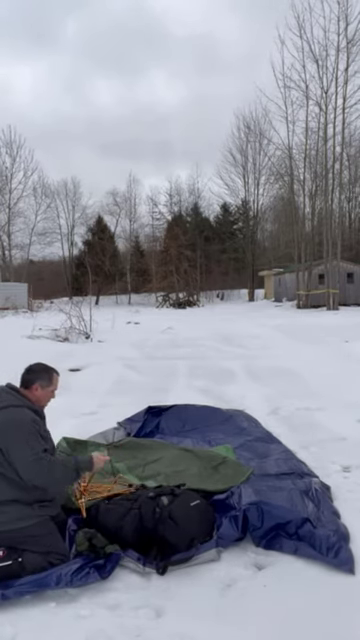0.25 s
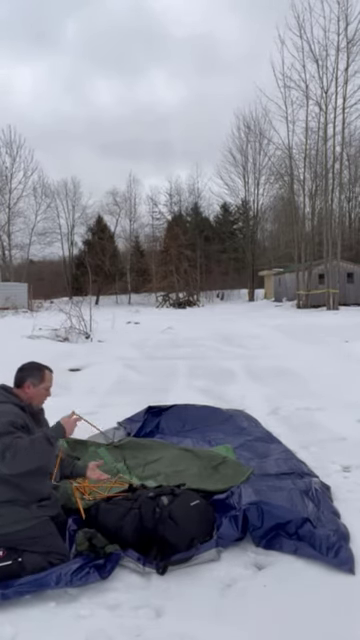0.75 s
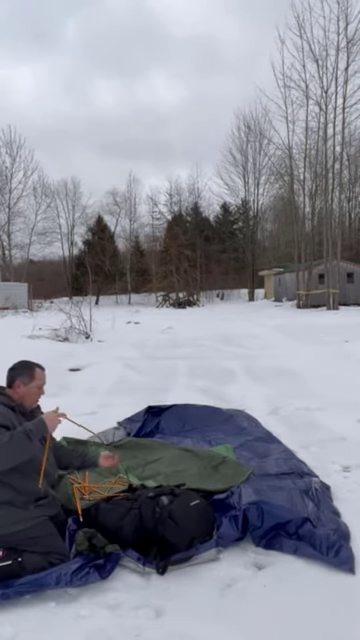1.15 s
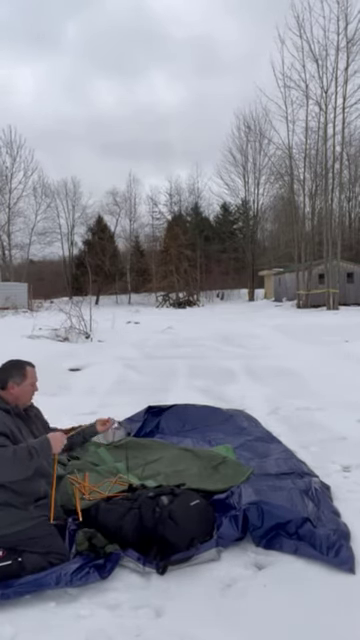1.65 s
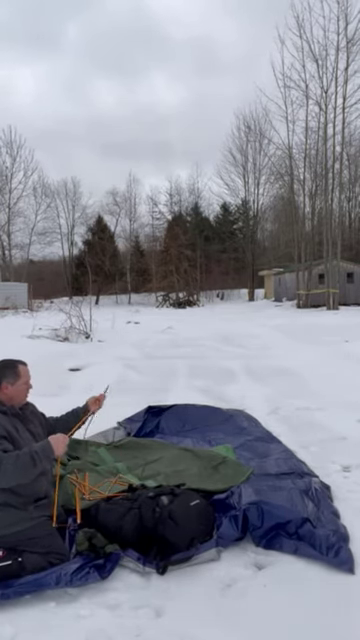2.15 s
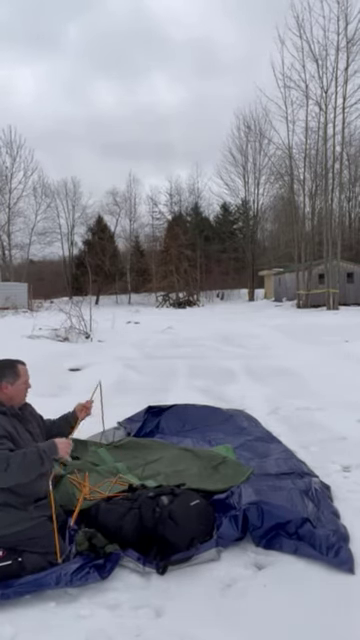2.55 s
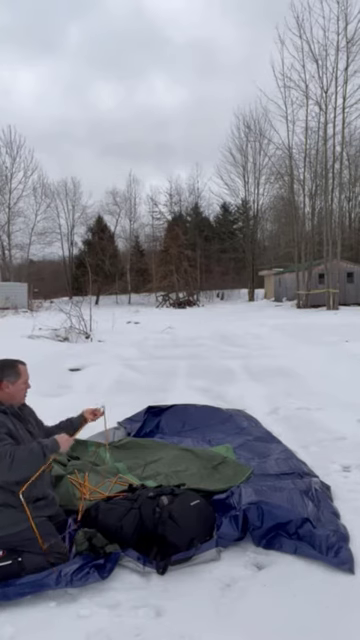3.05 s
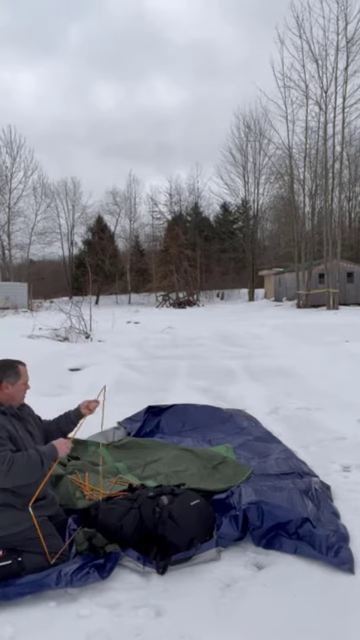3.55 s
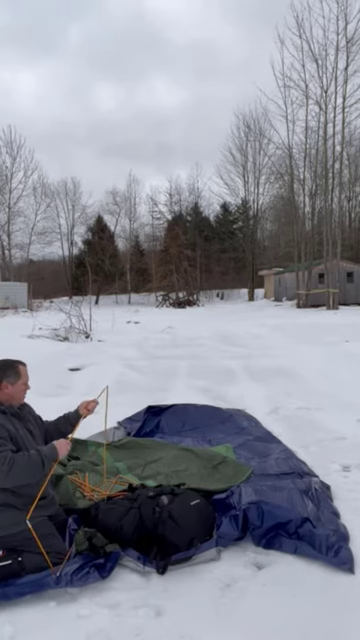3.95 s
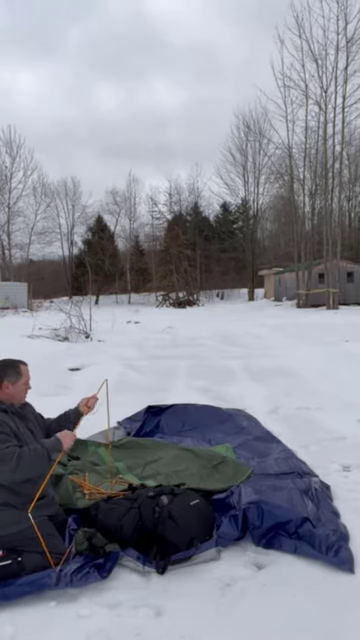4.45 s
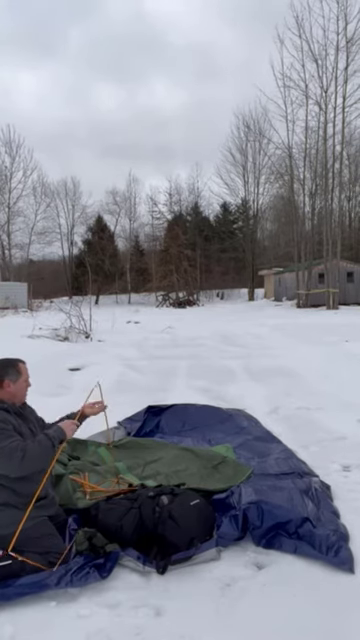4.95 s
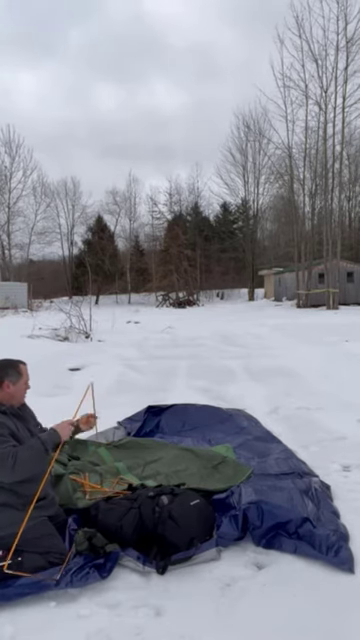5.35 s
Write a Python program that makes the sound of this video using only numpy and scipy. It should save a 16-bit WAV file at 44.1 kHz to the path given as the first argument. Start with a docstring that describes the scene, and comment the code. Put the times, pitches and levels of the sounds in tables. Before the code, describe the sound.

Metal tent poles click and snap together as they unfold, with light nylon rustling, while wind on the microphone grows into hard low buffets.

```python
"""Unfolding tent poles

Shock-corded aluminium tent poles are unfolded on a snowy field. The sections knock and snap into their
ferrules (noise bursts in tube resonances) and slide on each other (friction noise in the same resonances).
Nylon cloth swishes and ticks, and sleeves brush past a jacket (shaped noise). A breeze rumbles on the
microphone (low-passed noise) and grows into hard buffets near the end (short swings of falling pitch)."""
import sys
import numpy as np
from scipy import signal
from scipy.fft import rfft, irfft, next_fast_len
from scipy.io import wavfile
from scipy.ndimage import uniform_filter1d, minimum_filter1d

SR = 44100
rng = np.random.default_rng(int(sys.argv[2]) if len(sys.argv) > 2 else 0)


def inscribe(sig):
    """Save sig as 16-bit PCM at rate SR to the path in sys.argv[1].

    A 1-D sig is mono; a 2-D sig holds one channel per row.
    Samples are clipped to [-1, 1] before scaling.
    """
    pcm = np.round(np.clip(np.atleast_2d(sig).T, -1, 1) * 32767)
    wavfile.write(sys.argv[1], SR, pcm.astype(np.int16))


N = 247382

# spectrum of the still air: f/Hz, relative level per Hz/dB
AIR_SPECTRUM = [(25, -3), (60, -9), (150, -4.5), (400, -15), (1000, -23.5), (2000, -30), (3000, -40),
                (6000, -34.5), (10000, -47.5), (15000, -57.5)]
# spectrum of the wind before its moving low-pass: f/Hz, relative level per Hz/dB
WIND_SPECTRUM = [(22, -15), (35, -9.5), (55, 8.5), (90, 1), (150, -2), (250, -7), (400, -12.5),
                 (650, -12.5), (950, -15.5), (2000, -17)]
# steady breeze on the microphone, between gusts: t/s, relative pressure level/dB
BREEZE_PRESSURE = [(0.0, -71), (0.3, -65), (0.55, -94), (0.9, -75.5), (1.0, -56.5), (2.1, -62.5),
                   (2.8, -58), (2.97, -70), (3.15, -60.5), (4.4, -58), (4.65, -36), (4.97, -54.5),
                   (5.15, -51.5), (5.6, -23.5)]
# gusts: t/s, relative pressure level/dB, half length (to 1/e)/s
GUST_EVENTS = [(0.248, -54, 0.009), (1.07, -52, 0.042), (1.249, -45, 0.024), (1.488, -51, 0.038),
               (1.755, -51, 0.067), (1.918, -44, 0.047), (2.06, -44, 0.05), (2.426, -39, 0.042),
               (3.072, -53, 0.035), (3.24, -42, 0.028), (3.354, -47, 0.016), (3.526, -42, 0.038),
               (3.646, -39.5, 0.067), (3.818, -43.5, 0.036), (4.025, -41, 0.078), (4.246, -44, 0.013),
               (4.544, -46.5, 0.088), (4.67, -25.5, 0.0097), (4.767, -34.5, 0.02), (4.88, -28, 0.027),
               (5.06, -24, 0.047), (5.117, -26, 0.032), (5.212, -16, 0.025), (5.257, -16, 0.032),
               (5.326, -24, .022), (5.502, -26.5, 0.043), (5.545, -15.5, 0.0099)]
# single eddies that hit the microphone: t/s, peak level before the low-pass/dB, central f/Hz
EDDIES = [(1.229, -40, 125), (1.962, -39.5, 188), (2.028, -39, 180), (2.068, -43.5, 190), (2.377, -29, 67),
          (2.417, -27, 132), (3.251, -33.5, 119.6), (3.519, -30, 137), (4.014, -35, 100), (4.072, -42, 415),
          (4.669, -28, 332), (4.764, -40, 628), (4.8845, -11, 900), (4.8861, -6.5, 476),
          (5.022, -31.5, 534), (5.062, -25, 850), (5.066, -20, 194), (5.086, -13.5, 73.4), (5.193, -9, 448),
          (5.212, -10.5, 231), (5.24, -15.5, 521), (5.244, -13.5, 136), (5.253, -11, 683),
          (5.2668, -6.5, 770), (5.269, -9, 820), (5.307, -20.5, 488), (5.322, -16.5, 277.3),
          (5.461, -24, 297), (5.483, -23, 503), (5.512, -18.5, 480), (5.5471, -4, 499), (5.555, -9, 222)]
# pulls on a section: t of the fastest moment/s, relative level of sliding tubes/dB, level of cloth/dB,
# rise over 20 dB/s, fall over 20 dB/s
PULL_EVENTS = [(0.322, -62, -64.5, 0.61, 0.052), (0.5, -64, -73, 0.2, .12), (0.58, -51, -71, 0.3, 0.24),
               (0.661, -35.5, -50, .02, .04), (0.79, -84, -69, 0.076, 0.15),
               (1.012, -55.5, -58, 0.041, 0.082), (1.35, -52, -58.5, 0.019, 0.038),
               (2.012, -55, -68.5, 0.057, 0.031), (2.22, -97, -65.5, 0.023, 0.015),
               (2.39, -64.5, -71.5, 0.18, 0.22), (2.54, -58, -64, 0.082, 0.026),
               (2.73, -63, -64.5, 0.031, 0.089), (2.878, -49, -52, 0.065, 0.097),
               (3.121, -52, -58.5, 0.27, 0.11), (3.48, -51, -67, 0.079, 0.042),
               (3.728, -55, -65.5, .03, 0.032), (4.14, -60, -66, 0.028, 0.031),
               (4.271, -71, -66, 0.057, 0.052), (4.42, -43, -44.5, 0.044, 0.032),
               (4.56, -42.5, -50.5, 0.14, 0.057), (4.649, -47, -61, 0.022, 0.089),
               (4.94, -39, -42.5, .05, 0.051), (5.219, -29.5, -38, 0.056, 0.043),
               (5.431, -57.5, -65, 0.089, 0.084)]
# spectrum of the tent cloth: f/Hz, relative level per Hz/dB
CLOTH_SPECTRUM = [(500, -13), (1600, -11.5), (2200, -9), (2600, -4.5), (4500, -2), (5700, 0), (7500, -3),
                  (10500, -3), (11800, -6), (13000, -8), (15500, -17.5)]
# sleeves brushing past the jacket: t/s, level/dB, half length (Gaussian spread, at least 0.005)/s
SLEEVE_BRUSHES = [(.22, -82.5, 0.56), (0.326, -67, 0.018), (0.582, -68.5, 0.012), (0.674, -69, 0.007),
                  (1.03, -75.5, 0.02), (2.413, -80.5, 0.07), (2.741, -63.5, 0.026), (2.878, -74, 0.043),
                  (3.099, -80, 0.1), (4.274, -62.5, 0.029), (4.39, -64, 0.053), (4.575, -54.5, 0.024)]
# spectrum of the sleeve: f/Hz, relative level per Hz/dB
SLEEVE_SPECTRUM = [(200, -9), (500, 6.5), (900, 9.5), (1600, -6), (2150, -14), (2550, -9.5), (3000, 4.5),
                   (4200, -10), (9000, -21), (15000, -41.5)]
# resonances of the tubes: f/Hz, width/Hz, relative level/dB
TUBE_MODES = [(2143, 110, 0.5), (2800, 67, -7.5), (3141, 400, -0.5), (3438, 250, 7.5), (3628, 260, 7),
              (3954, 410, -7), (5669, 140, 5), (6430, 40, -3), (7100, 69, -6.5), (6610, 290, -10.5),
              (7090, 780, -2), (8180, 290, -11.5), (9010, 63, -2.5), (8835, 430, -0.5), (10194, 550, 0.5),
              (10130, 1200, -11), (11370, 1700, 4.5), (13300, 140, -3), (13510, 640, -8),
              (16700, 460, -15.5)]
# pole knocks: t/s, relative level/dB, brightest f/Hz (low: soft bump, high: hard snap),
# f of the resonance that sings out/Hz, its level against the rest/dB
POLE_KNOCKS = [(0.397, -31, 3540, 5600, -3.5), (0.5671, -38, 4670, 3220, -9),
               (0.6553, -19.5, 6500, 3388, 0.5), (0.691, -39, 4700, 2904, -6),
               (0.7842, -18.5, 7640, 5600, -19), (0.8653, -53, 8500, 5600, -7),
               (0.9981, -26.5, 7800, 8830, -2), (1.3402, -31.5, 7340, 3533, -6.5),
               (1.88, -59.5, 7470, 5600, -11), (1.976, -51.5, 6200, 3388, -6),
               (2.0131, -52.5, 5500, 3220, -4), (2.378, -29, 7800, 2120, -20.5),
               (2.4836, -49, 7500, 5600, 0), (2.5282, -42, 5330, 2120, -17), (2.7155, -43, 6300, 2904, -6),
               (2.8679, -11.5, 9300, 5990, -8), (2.8722, -13.5, 7300, 2120, -18.5),
               (2.9, -27, 6900, 3220, -9.5), (2.9274, -32.5, 10100, 10010, 2),
               (3.0003, -39, 7700, 2120, -24), (3.0998, -26.5, 8950, 3501, -15.5),
               (3.1097, -16, 8500, 3501, -12.5), (3.2083, -40, 5800, 5600, 2),
               (3.453, -44, 7250, 3501, -13), (3.4868, -41.5, 4670, 3501, 0.5),
               (3.6282, -56.5, 8000, 5600, -6), (3.7223, -43, 6430, 3501, -15),
               (4.3232, -31, 3350, 2904, -3.5), (4.4222, -11, 7300, 3501, -27),
               (4.49, -31.5, 5760, 2120, -14), (4.5421, -19.5, 5980, 3920, -6.5),
               (4.5495, -25.5, 3580, 3920, 0), (4.5722, -27.5, 7200, 3388, -9.5),
               (4.6435, -36.5, 5600, 3501, -10.5), (4.8955, -16, 6940, 5600, -17.5),
               (4.9208, -10.5, 9900, 3920, -25), (4.9271, -4.5, 11200, 6580, 0.5),
               (4.974, -31.5, 7270, 5600, -2), (5.1705, -15.5, 7100, 3501, -4),
               (5.1812, -13.5, 8820, 5600, -10), (5.1965, -7, 9000, 5600, -20),
               (5.2018, -9, 9400, 6580, -4), (5.2093, -0.5, 9800, 6580, -19), (5.2161, -25, 6340, 5990, -8)]
# two microphone ports: f/Hz, phase by which the left leads/rad
PORT_LEAD = [(2000, 0), (4900, .08), (7000, .75), (9400, 1.75), (11500, 2.6), (13000, 3.05)]


def from_db(db):
    """Level: an amplitude ratio is 10 to the power of dB/20."""
    return 10 ** (np.asarray(db) / 20)


def rms_one(x):
    """Normalisation: scale to an rms of 1."""
    return x / np.sqrt(np.mean(x ** 2) + 1e-30)


def in_time(rows):
    """Interpolation: each column of a curve at every sample."""
    s, *columns = np.transpose(rows)
    return [np.interp(np.arange(N) / SR, s, column) for column in columns]


def at_hz(points, hz):
    """Interpolation on a logarithmic frequency axis."""
    f, value = np.transpose(points)
    return np.interp(np.log(np.maximum(hz, 1)), np.log(f), value)


def drift(rate_hz):
    """Slow random fluctuation: noise through a double real pole, with spread 1."""
    step = 40  # samples between slow values
    r = np.exp(-2 * np.pi * rate_hz * step / SR)
    noise = rng.standard_normal(N // step + 2002)
    slow = signal.lfilter([1], [1, -2 * r, r * r], noise)[2000:]  # the settling is dropped
    return np.interp(np.arange(N) / step, np.arange(len(slow)), rms_one(slow))


def coloured(x, spectrum):
    """Spectral shaping: weight a long noise in frequency, then scale to rms 1."""
    size = next_fast_len(N)
    weight = from_db(at_hz(spectrum, np.fft.rfftfreq(size, 1 / SR)))
    return rms_one(irfft(rfft(x, size) * weight, size)[..., :N])


def resonate(x, hz, width_hz):
    """Resonance: a damped two-pole oscillator with gain 1 at its top."""
    r = np.exp(-np.pi * width_hz / SR)
    poles = [1, -2 * r * np.cos(2 * np.pi * hz / SR), r * r]
    return signal.lfilter(np.array([1, 0, -1]) * (1 - r * r) / 2, poles, x)


def high_pass(x, hz, order):
    """High-pass filtering: remove what lies below hz."""
    return signal.sosfilt(signal.butter(order, hz, "high", fs=SR, output="sos"), x)


def low_pass(x, hz, order):
    """Low-pass filtering: remove what lies above hz."""
    return signal.sosfilt(signal.butter(order, hz, fs=SR, output="sos"), x)


def add(out, s, sound):
    """Superposition: mix a short sound in at time s."""
    start = int(np.clip(round(s * SR), 0, N - 1))
    out[start:start + len(sound)] += sound[:N - start]


def friction(grain_db, flutter_db, flutter_hz):
    """Stick-slip friction: tiny slips of very uneven size that come in clumps."""
    size_db = grain_db * rng.standard_normal(N) + flutter_db * drift(flutter_hz)
    return rng.standard_normal(N) * from_db(size_db)


def still_air(level_db=-74, apart_db=-7):
    """Coherence of diffuse sound: a faint hush, shared in the bass, different at each port higher up."""
    shared, apart = coloured(rng.standard_normal((2, N)), AIR_SPECTRUM)
    difference = high_pass(apart, 260, order=2) * np.array([[1], [-1]])
    return from_db(level_db) * (shared + from_db(apart_db) * difference)


def wind_pressure(roundness=2.1):
    """Addition of powers: gusts swell and fade on top of the steady breeze; pressure in dB."""
    # roundness is the exponent of a gust's shape: 1 = pointed, 2 = round
    t = np.arange(0, N, 32) / SR
    power = from_db(np.interp(t, *np.transpose(BREEZE_PRESSURE))) ** 2
    for s, db, half in GUST_EVENTS:
        away = np.minimum(np.abs(t - s) / half, 10)
        power = power + (from_db(db) * np.exp(-away ** roundness)) ** 2
    return in_time(np.column_stack([t, 10 * np.log10(power)]))[0]


def breeze(level_db=-1.5, edge_hz=250, edge_at_db=-50, db_per_octave=19.0, top_hz=1000, lump_db=3.5,
           steepness=4.8):
    """Turbulence: the harder it blows, the finer the eddies and the higher the rumble reaches."""
    pressure_db = wind_pressure() + lump_db * drift(62)
    edge = edge_hz * 2 ** ((pressure_db - edge_at_db) / db_per_octave)
    # the same turbulence through ever wider low-passes, blended to follow the edge
    steps = 70 * 2 ** (np.arange(10) / 2)
    place = np.interp(np.log(np.minimum(edge, top_hz)), np.log(steps), np.arange(len(steps)))
    size, out = next_fast_len(N), np.zeros(N)
    spectrum = rfft(coloured(rng.standard_normal(N), WIND_SPECTRUM), size)
    hz = np.fft.rfftfreq(size, 1 / SR)
    for k, step in enumerate(steps):
        rumble = irfft(spectrum / np.sqrt(1 + (hz / step) ** (2 * steepness)), size)[:N]
        out += rumble * np.maximum(1 - np.abs(place - k), 0)
    # level the rumble first, so that its strength follows the pressure alone
    power = uniform_filter1d(uniform_filter1d(out ** 2, size=1800), size=1800)
    return out / np.sqrt(power + 1e-12) * from_db(pressure_db + level_db)


def buffets(half_cycles=0.8505, shed_ratio=1.39, shed_db=-20.5, wobble=.13, slowing=.12):
    """Vortex shedding: an eddy shakes the air for a cycle or two, slowing, and sheds a smaller one."""
    out, unsteady = np.zeros(N), np.tanh(drift(290))
    # the shed eddy is higher in pitch and weaker, and is centred on the same moment
    shed = [(s, db + shed_db, hz * shed_ratio) for s, db, hz in EDDIES]
    for s, peak_db, hz in list(EDDIES) + shed:
        half = half_cycles / hz  # seconds
        u = np.arange(-3 * half, 3 * half, 1 / SR) / half
        start = s - 3 * half
        wander = unsteady.take(int(start * SR) + np.arange(len(u)), mode="wrap")
        pitch = hz * np.exp(wobble * wander - slowing * u)
        swing = np.sin(2 * np.pi * (np.cumsum(pitch) / SR + rng.random()))
        add(out, start, from_db(peak_db) * np.exp(-u ** 2) * swing)
    return out


def wind(top_hz=1080, buffet_top_hz=1150, uneven_db=0.03, fine_hz=950, fine_db=-9, fine_top_hz=1700):
    """Eddy size and coherence: the finest eddies are small enough to hit each port differently."""
    both = low_pass(breeze(), top_hz, order=7) + low_pass(buffets(), buffet_top_hz, order=4)
    fine = high_pass(both, fine_hz, order=4) * np.array([drift(250), drift(270)])
    fine = low_pass(high_pass(fine, fine_hz * 0.59, order=3), fine_top_hz, order=5)
    balance = from_db(uneven_db * drift(150) * np.array([[1], [-1]]))
    return both * balance + from_db(fine_db) * fine


def handling():
    """Common motion: each pull speeds up and dies away, moving tubes and cloth; their levels in dB."""
    t, power = np.arange(0, N, 32) / SR, 1e-12
    for s, slide_db, cloth_db, rise, fall in PULL_EVENTS:
        speed = from_db(-20 * np.minimum(np.maximum((s - t) / rise, (t - s) / fall), 10))
        power = power + (from_db([[slide_db], [cloth_db]]) * speed) ** 2
    return in_time(np.column_stack([t, *10 * np.log10(power)]))


def cloth(cloth_db, creases_per_s=90, crease_db=7, crease_s=.0015):
    """Friction and buckling: nylon swishes, and its creases flip one by one in small ticks."""
    # crease_db is the middle height of a tick against the swish, crease_s its decay to 1/e
    flips = (rng.random(N) < creases_per_s / SR) * from_db(crease_db + 4 * rng.standard_normal(N))
    ticks = signal.lfilter([1], [1, -np.exp(-1 / (crease_s * SR))], flips + 1e-18)
    swish = friction(grain_db=3.0, flutter_db=2.0, flutter_hz=70)
    return from_db(cloth_db) * coloured(swish * (1 + ticks), CLOTH_SPECTRUM)


def sleeves(tube_db=-6):
    """Friction-driven resonance: dull, grainy swells set the held tube humming in its lowest resonance."""
    t = np.arange(N) / SR
    strokes = sum(from_db(db) * np.exp(-.5 * ((t - s) / max(half, .005)) ** 2)
                  for s, db, half in SLEEVE_BRUSHES)
    rub = coloured(friction(grain_db=6.0, flutter_db=3.0, flutter_hz=80), SLEEVE_SPECTRUM)
    hz, width, _ = TUBE_MODES[0]
    return strokes * (rub + from_db(tube_db) * rms_one(resonate(rub, hz, width)))


def sliding(slide_db, centre_hz=3450, width_hz=500, shift_db=7.5, level_db=-8.5):
    """Friction-driven resonance: a travelling contact wakes now one, now another of the tube's modes."""
    rub = resonate(friction(grain_db=0.0, flutter_db=4.0, flutter_hz=32), centre_hz, width_hz)
    ring = np.zeros(N)
    for k, (hz, width, db) in enumerate(TUBE_MODES):
        ring += resonate(rub, hz, width) * from_db(db + shift_db * drift(10.0)) * (-1) ** k
    steady = ring / np.sqrt(uniform_filter1d(ring ** 2, size=3000) + 1e-18)
    return from_db(slide_db + level_db) * steady


def rattle(slide_db, per_s=14, level_db=-36, follows=.65, size_db=3.5, rest_db=-95):
    """Random impacts: loose sections tick against each other, louder while they are being pulled."""
    touches = (rng.random(N) < per_s / SR) * from_db(size_db * np.clip(rng.standard_normal(N), -2, 2))
    below_loudest_db = np.maximum(slide_db, rest_db) - np.max(slide_db)
    force = touches * from_db(level_db + follows * below_loudest_db)
    return sum(resonate(force + 1e-18, hz, width) * from_db(db) * (-1) ** k
               for k, (hz, width, db) in enumerate(TUBE_MODES))


def knocks(level_db=-27.0, chatter_ms=2.6, rise_ms=1.3, halving_db=39, jiggle_db=-35, jiggle_t60=0.12,
           slip_db=3.0, spread_db=3.0, focus_db=8, crack_db=-28, hollow_db=-34.5, lowest_hz=550):
    """Impact excitation: metal ends chatter for a few ms, then the shaken sections jiggle on a little."""
    # chatter_ms and rise_ms hold for a knock of -20 dB; one harder by halving_db takes half the time
    # focus_db: loss of a resonance per squared octave from the knock's brightest pitch
    # slip_db, spread_db: unevenness of the slips in a knock, and of its resonances from knock to knock
    out, t = np.zeros(N), np.arange(SR // 8) / SR
    jiggle = from_db(jiggle_db) * np.exp(-np.log(1000) * t / jiggle_t60)
    tube_hz, _, tube_db = np.transpose(TUBE_MODES)
    for s, knock_db, bright_hz, sing_hz, sing_db in POLE_KNOCKS:
        ms = t * 1000 * 2 ** ((knock_db + 20) / halving_db)
        contact = (np.exp(-ms / chatter_ms) + jiggle) * (1 - np.exp(-ms / rise_ms)) ** 2
        slips = rng.standard_normal(len(t)) * from_db(slip_db * rng.standard_normal(len(t)))
        force = contact * slips
        rings = np.array([resonate(resonate(force, hz, width), hz, hz / 3) * (-1) ** k
                          for k, (hz, width, _) in enumerate(TUBE_MODES)])
        # the hardness of the contact shares the energy among the resonances
        focus = -focus_db * np.log2(tube_hz / bright_hz) ** 2
        shares = from_db(tube_db + focus + spread_db * rng.standard_normal(len(tube_hz)))
        # the spot that is hit lets one resonance sing out
        singing = from_db(sing_db) * rms_one(rings[np.argmin(np.abs(tube_hz - sing_hz))])
        crack = from_db(crack_db) * rms_one(high_pass(force, lowest_hz, order=1))
        hollow = from_db(hollow_db) * rms_one(rings[0])  # the lowest resonance
        sound = crack + rms_one(shares @ rings) + singing + hollow
        add(out, s - rise_ms / 2000, sound * from_db(knock_db + level_db))
    return high_pass(out, lowest_hz, order=2)


def ports(x, left_db=0.66):
    """Interaural-style phase difference: the treble reaches the two ports out of step."""
    size = next_fast_len(N)
    turn = np.exp(.5j * at_hz(PORT_LEAD, np.fft.rfftfreq(size, 1 / SR)))  # half the lead to each side
    sides = np.array([turn * from_db(left_db), from_db(-left_db) / turn])
    return irfft(rfft(x, size) * sides, size)[:, :N]


def scattered(x, t60=0.038, dull_hz=8000):
    """Diffuse reflection: faint scatter from the ground and the tent, different at each port."""
    t = np.arange(SR // 5) / SR
    echo = rng.standard_normal((2, len(t))) * np.exp(-np.log(1000) * t / t60)
    echo = echo / np.sqrt(np.sum(echo ** 2, axis=1, keepdims=True))
    return signal.fftconvolve(low_pass(x, dull_hz, order=2)[None], echo, axes=1)[:, :N]


def scene(knock_scatter_db=-17, rub_scatter_db=-6):
    """Superposition: poles and cloth with their scatter, wind right on the microphone, and still air."""
    slide_db, cloth_db = handling()
    hits = knocks() + rattle(slide_db)
    rubs = sliding(slide_db) + cloth(cloth_db) + sleeves()
    scatter = scattered(from_db(knock_scatter_db) * hits + from_db(rub_scatter_db) * rubs)
    return ports(hits + rubs) + scatter + wind() + still_air()


def limited(x, limit=.62):
    """Peak limiting: both channels are turned down for a few ms around each peak over the limit."""
    gain = limit / np.maximum(np.abs(x).max(axis=0), limit)
    return x * uniform_filter1d(minimum_filter1d(gain, size=221), size=221)


def record(dry, cutoff_hz=15800):
    """Band limitation: the deepest bass is cut, peaks are limited, the top is cut."""
    level = limited(high_pass(dry, 40, order=2))
    return signal.sosfilt(signal.ellip(10, .1, 80, cutoff_hz, fs=SR, output="sos"), level)


dry = scene()
out = record(dry)
inscribe(out)
```